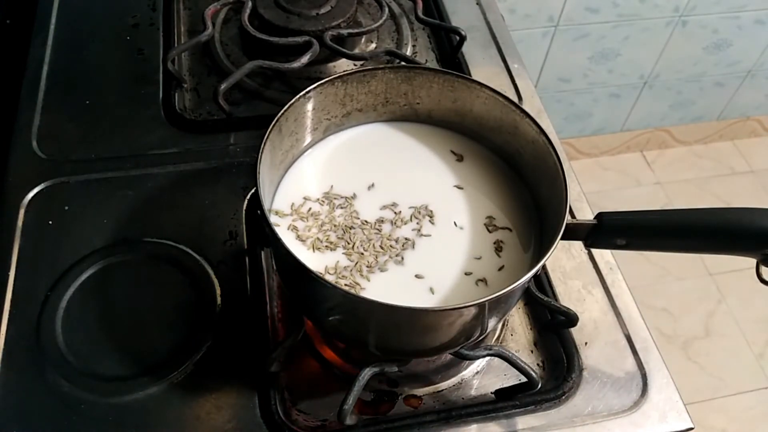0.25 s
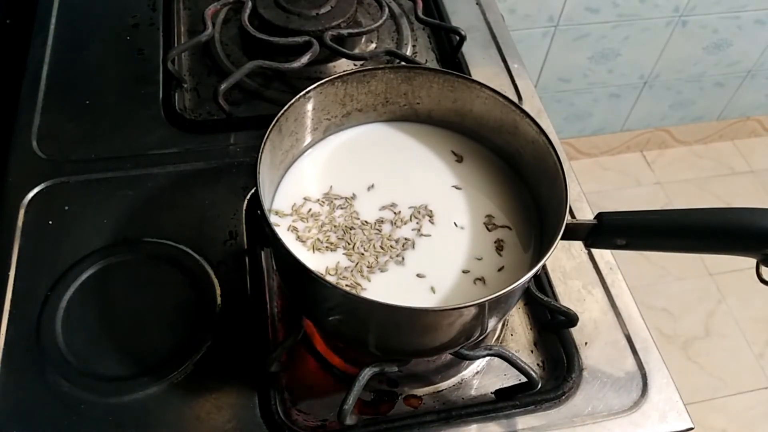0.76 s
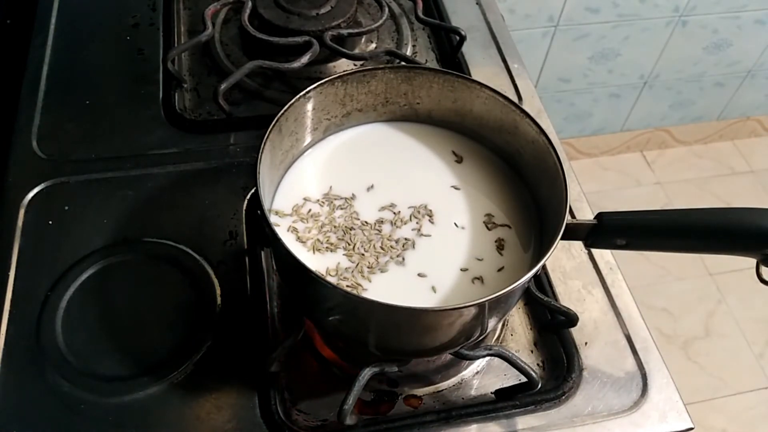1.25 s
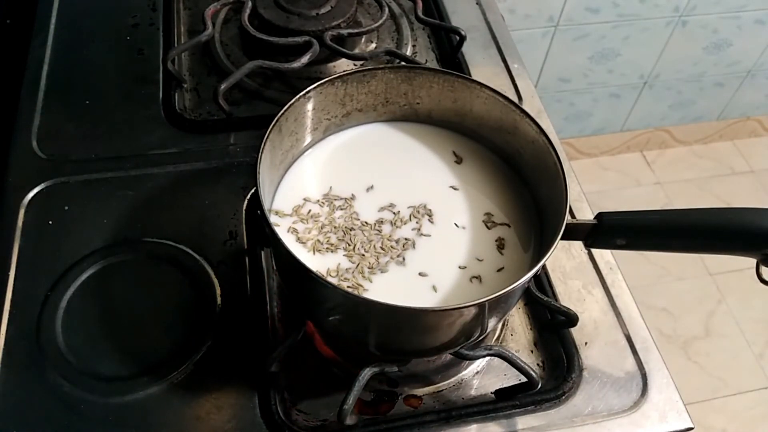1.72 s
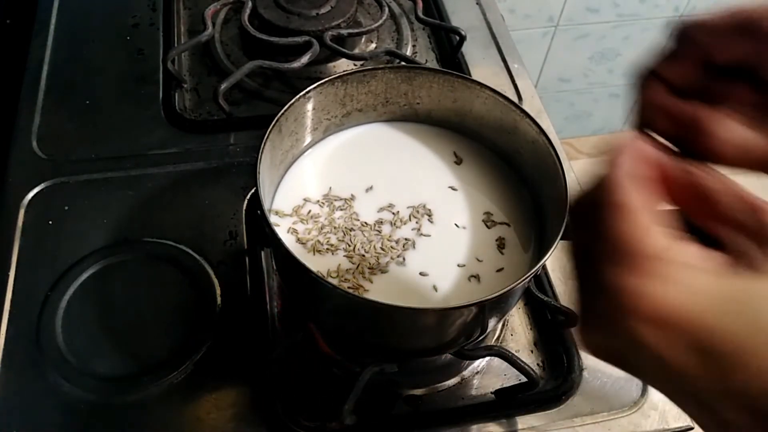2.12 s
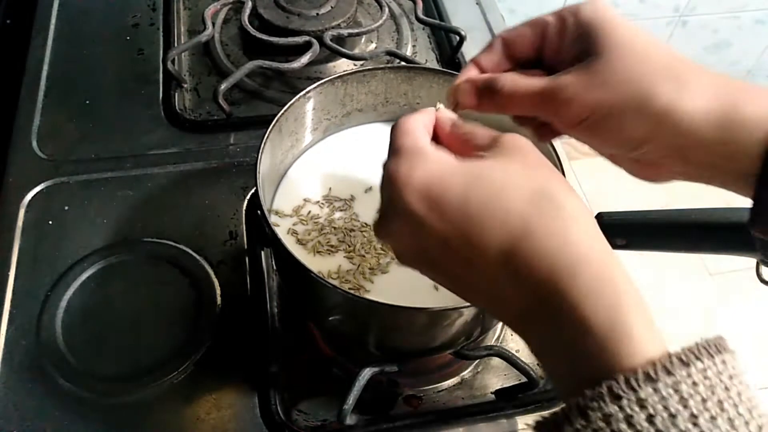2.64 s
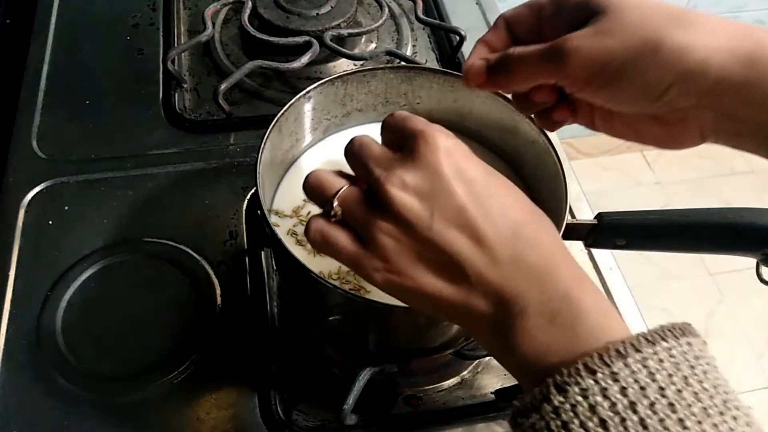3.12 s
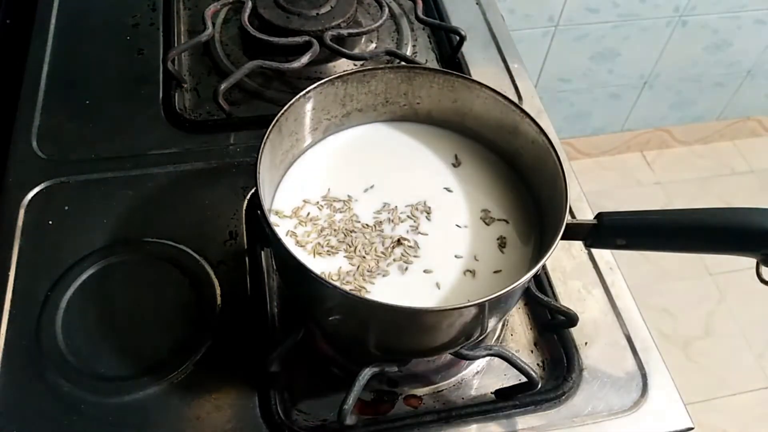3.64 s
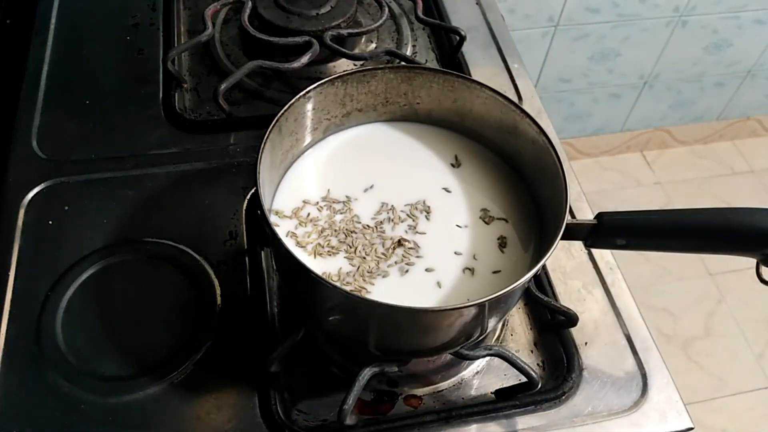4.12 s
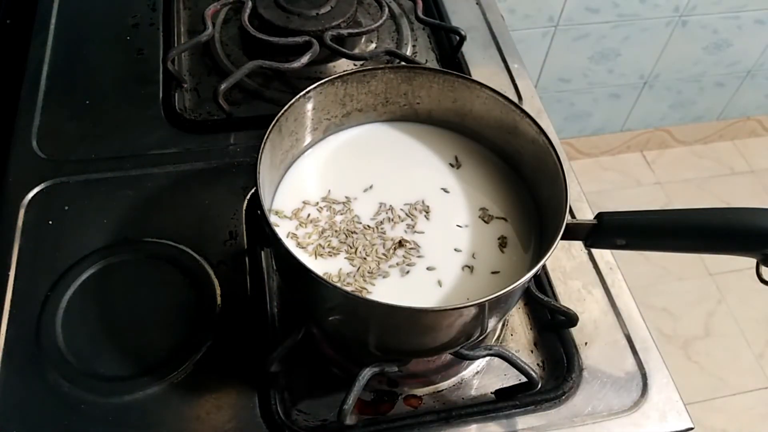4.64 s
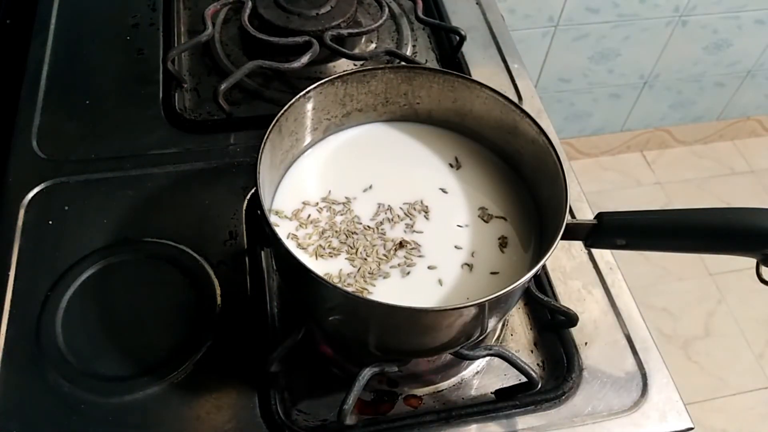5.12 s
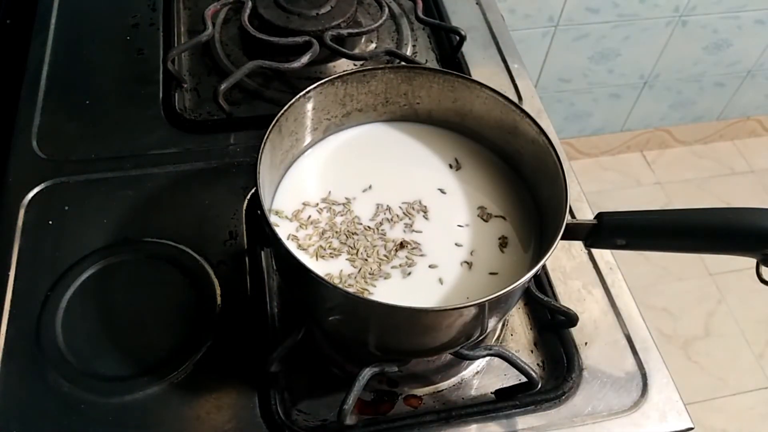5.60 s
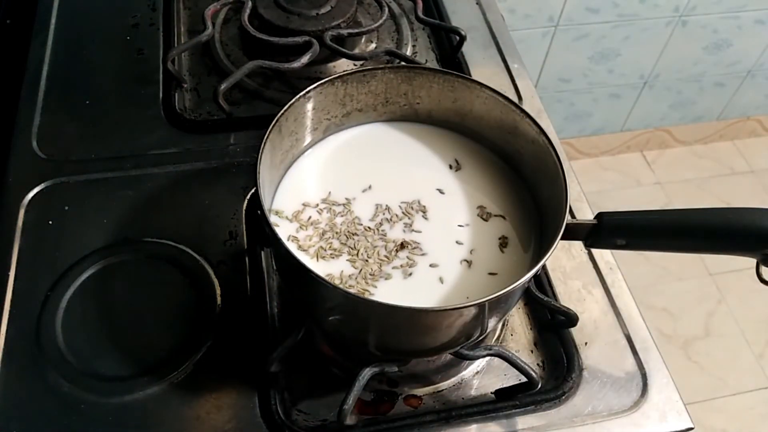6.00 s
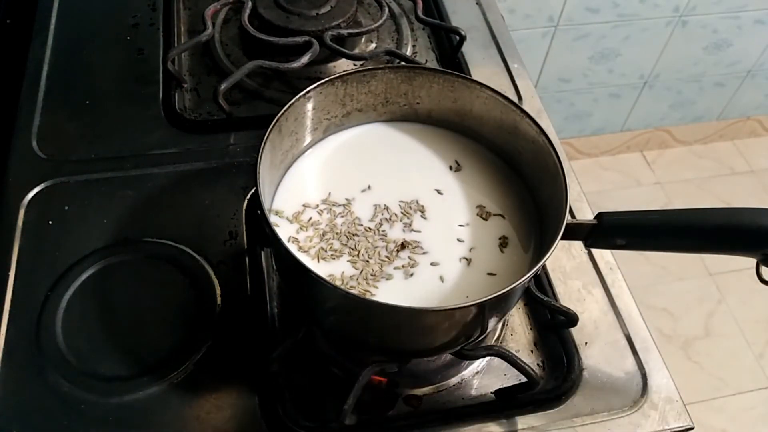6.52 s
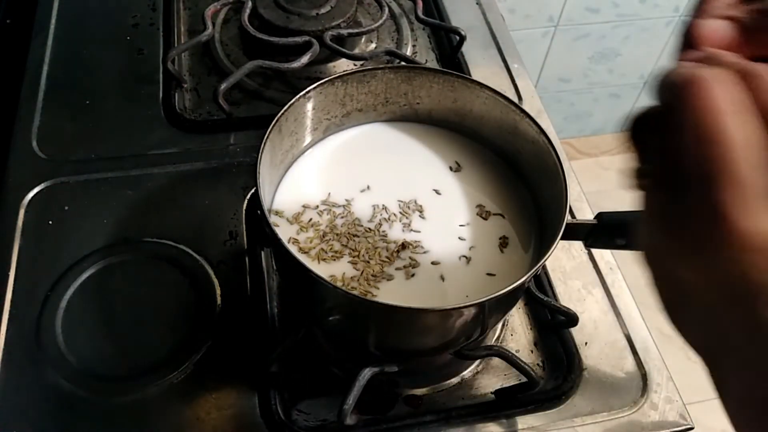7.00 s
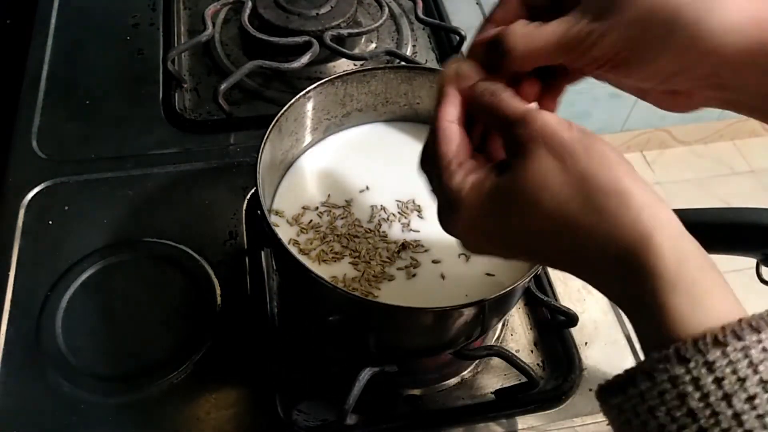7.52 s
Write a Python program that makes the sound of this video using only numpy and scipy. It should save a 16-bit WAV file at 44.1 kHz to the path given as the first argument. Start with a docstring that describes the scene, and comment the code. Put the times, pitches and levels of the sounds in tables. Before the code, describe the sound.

Close, bright gas-flame hiss wavering under a pan of milk, punctuated by a few metal clicks, soft knocks and a final dry pod crack.

```python
"""Milk on the gas hob

A gas burner hisses in small surges under a saucepan of milk in a tiled kitchen, heard from just above the hob.
Filtered noise makes its jet, the rush of its flames and a hollow note under the pan. The heating pan ticks
with short resonant clicks, once with a sizzle of grainy noise; a few soft knocks ring on decaying sines.
At the end fingers crack a spice pod over the pan, in short noise bursts. Behind it all, noise in the low
resonances of the room makes a faint rumble from outside, over a faint kitchen hum."""
import sys
import numpy as np
from scipy import signal
from scipy.fft import rfft, irfft
from scipy.io import wavfile
from scipy.ndimage import uniform_filter1d

SR = 44100
rng = np.random.default_rng(int(sys.argv[2]) if len(sys.argv) > 2 else 0)


def digitize_waveform(pressure):
    """Quantize a signal to 16-bit integers and store it at the path in sys.argv[1].

    Rows of a 2-D input are taken as channels; values are limited to [-1, 1].
    """
    field = np.atleast_2d(pressure).T
    bounded = np.clip(field, -1, 1)
    quanta = np.round(bounded * 32767).astype(np.int16)
    wavfile.write(sys.argv[1], SR, quanta)


N = 342216
TIME = np.arange(N) / SR  # s
FREQS = np.arange(N // 2 + 1) * SR / N  # Hz


def undb(db):
    """Decibels to gain."""
    return 10 ** (np.asarray(db) / 20)


def unit(x):
    """Scale to rms 1."""
    return x / np.sqrt(np.mean(x ** 2))


def colour(points):
    """Frequency response through (Hz, dB) points, falling away below the first."""
    hz, db = np.transpose(points)
    response = undb(np.interp(np.log(FREQS + 1), np.log(hz), db))
    return response * np.minimum(FREQS / hz[0], 1) ** 2


def resonance(hz, width):
    """Response of one resonator, gain 1 at its centre."""
    return 1j * FREQS * width / (hz ** 2 - FREQS ** 2 + 1j * FREQS * width)


def shape(x, response):
    """Filter by a frequency response."""
    return irfft(rfft(x) * response, N)


def above(x, hz):
    """The part of a sound that lies above a pitch."""
    return shape(x, 1 - 1 / (1 + (FREQS / hz) ** 10))


def noise(likeness=0., pan_db=0.):
    """Stereo white noise with a given left-right correlation and balance (positive is louder on the left)."""
    mid, side = rng.standard_normal((2, N))
    c = np.clip(likeness, -1, 1)
    mid = mid * np.sqrt((1 + c) / 2)
    side = side * np.sqrt((1 - c) / 2)
    return np.array([mid + side, mid - side]) * undb([[pan_db / 2], [-pan_db / 2]])


def flicker(rate, depth_db):
    """A gain that wanders at random, up to about rate times a second, by depth_db rms."""
    wander = unit(shape(rng.standard_normal(N), np.exp(-(FREQS / rate) ** 2)))
    return undb(depth_db * wander)


def steady(x, seconds):
    """Take the slow chance swells out of a narrow noise."""
    power = uniform_filter1d(np.mean(x ** 2, axis=0), int(seconds * SR), mode="wrap")
    return x / np.sqrt(power)


def fade(start, t60):
    """An envelope that jumps to 1 and dies away by 60 dB in t60 seconds."""
    age = TIME - start
    return (age >= 0) * np.exp(-np.log(1000) * np.clip(age / t60, 0, 10))


def bell(centre, half):
    """An envelope that swells to 1 and falls again."""
    return np.exp(-((TIME - centre) / half) ** 2 / 2)


def curve(points):
    """A (time, dB) curve as a gain per sample."""
    return undb(np.interp(TIME, *np.transpose(points)))


def echo_response(envelope, pan_db=0.):
    """Response of countless reflections that die along an envelope; it keeps the power of the sound."""
    return rfft(unit(noise(pan_db=pan_db) * envelope)) / np.sqrt(N)


def standing(depth, t60):
    """Reflections between hard surfaces leave fine peaks and dips, different on each side."""
    return 1 + depth * echo_response(fade(0, t60))


def burner():
    """One gas flow drives jet and flames; both sag slowly, and hands over the pan shade the jet."""
    flow = surges()
    shade_db, treble_shade_db = hands()
    jet_db, jet_share = -38.5, 0.3  # level between surges, and the part of a surge that the jet follows
    jet_sag, treble_sag, flame_sag = 0.44, 0.21, 0.78  # dB per s; the jet's top end sags more slowly
    gas = jet()
    treble = above(gas, 8000)
    hiss = (gas - treble) * undb(-jet_sag * TIME - shade_db)
    hiss = hiss + treble * undb(-treble_sag * TIME - treble_shade_db)

    # the low part of the rush follows the flow more strongly than the high part: dB per dB of flow
    low_share, high_share = 1.135, 0.9
    flame_db = -55.5
    flame_flow = flow - lulls()
    fire = flame()
    bright = above(fire, 2070)
    rush = (fire - bright) * undb(low_share * flame_flow) + bright * undb(high_share * flame_flow)
    return undb(jet_db + jet_share * flow) * hiss + undb(flame_db - flame_sag * TIME) * rush + hollow()


def surges():
    """Rise of the gas flow in dB: each surge comes quickly, holds and ebbs away."""
    # surges of the gas flow: (start [s], rise [dB], hold [s])
    gas_surges = [(-0.1, 4, 0.093), (0.154, 3.5, 0.059), (0.623, 6.5, 0.26), (1.277, 4.5, 0.083),
                  (1.87, 6.5, 0.43), (2.587, 4, 0.34), (3.408, 8.5, 0.22), (3.905, 3.5, 0.36),
                  (4.35, 4.5, 0.14), (4.814, 7, 0.33), (5.453, 8, 0.19), (6.318, 10.5, 0.077),
                  (7.144, 4, 0.29)]
    attack, release = 0.085, 0.35  # s
    rise = 0
    for start, db, hold in gas_surges:
        age = TIME - start
        onset = np.clip(age / attack, 0, 1)
        ebb = np.exp(-np.maximum(age - attack - hold, 0) / release)
        rise = rise + db * onset * ebb
    return rise


def hands():
    """Loss in dB that hands over the pan bring to the hiss, below and in its treble."""
    # hands in the way of the microphone: (from [s], to [s], loss [dB], loss in the treble [dB])
    hand_passes = [(2.152, 3.418, 1.5, 1.5), (7.435, 7.9, 2.5, 0.2)]
    move = 0.033  # s to come or go
    loss = 0
    for start, end, db, treble_db in hand_passes:
        cover = np.clip(np.minimum(TIME - start, end - TIME) / move + .5, 0, 1)
        loss = loss + np.outer([db, treble_db], cover)
    return loss


def lulls():
    """Dips of the flame rush in dB of flow: it sinks, stays low and comes back at once."""
    # lulls of the flames: (time of return [s], time from first sinking to return [s], depth [dB of flow])
    flame_lulls = [(4.81, 0.093, 3), (6.36, 0.61, 1), (7.195, 0.23, 8), (7.67, 0.14, 3.5)]
    back = 0.014  # s
    dip = 0
    for s, sink, db in flame_lulls:
        dip = dip + np.interp(TIME, [s - sink, s - sink / 2, s, s + back], [0, db, db, 0])
    return dip


def rings():
    """Lift that the narrow rings of burner and pan give to any sound under the pan."""
    # rings of burner and pan: (pitch [Hz], width [Hz], lift [dB])
    metal_rings = [(2770, 90, 3), (3526, 70, 4), (4344, 80, 4), (5471, 60, 4.5), (6000, 30, 4),
                   (6400, 50, 3), (7325, 70, 3), (7477, 45, 3), (9016, 70, 4)]
    return 1 + sum((undb(db) - 1) * abs(resonance(hz, width)) ** 2 for hz, width, db in metal_rings)


def jet():
    """Gas hisses evenly from the nozzle, coloured by the burner's rings."""
    # jet as heard towards the left and the right: (pitch [Hz], level per Hz [dB])
    left = [(2500, -40), (3600, -17.5), (4400, -7), (5600, -5), (6500, -3.5), (7400, 0.5), (8500, -3),
            (10500, -11), (12500, -15.5), (14300, -14.5)]
    right = [(2500, -25), (3600, -16.5), (4400, -7), (5600, -5), (6500, 2), (7300, -1), (8300, -8),
             (10500, -12), (12500, -17.5)]
    ripple = standing(depth=.2, t60=.12)
    response = np.array([colour(left), colour(right)]) * rings() * ripple
    return unit(shape(noise(likeness=-0.087), response)) * flicker(rate=15, depth_db=.35)


def flame():
    """The ring of small flames gives a soft rush; two parts of the ring flutter each on its own."""
    # flame under the pan: (pitch [Hz], level per Hz [dB])
    flame_colour = [(780, -17), (930, -8), (1100, 2.5), (1450, 1.5), (2300, 0.5), (2800, 3), (3600, 0.5),
                    (6000, -18.5)]
    response = colour(flame_colour) * rings()
    rush = 0
    for _ in range(2):
        part = shape(noise(likeness=0.69, pan_db=2.5), response * standing(depth=1.0, t60=0.069))
        rush = rush + part * flicker(rate=5.7, depth_db=5)
    return steady(rush, seconds=0.069) * flicker(rate=27, depth_db=1.1)


def hollow():
    """The gap under the pan gives the flames a hollow note that flutters, comes and goes."""
    # hollow note: (pitch [Hz], level per Hz [dB])
    note_colour = [(480, -28), (570, -14), (625, 1), (685, 1.5), (722, 4), (770, -5.5), (860, -16),
                   (1100, -21)]
    # its loudness over time: (time [s], level [dB])
    note_level = [(0, -57), (.3, -62.5), (.64, -69), (.75, -57.5), (1.0, -55.5), (1.25, -70.5), (1.42, -57),
                  (1.87, -69.5), (1.95, -59), (2.55, -61), (3.0, -63.5), (3.14, -67), (3.65, -58.5),
                  (3.87, -64), (4.0, -56), (4.7, -62.5), (5.7, -58), (6.02, -69), (6.2, -63), (6.5, -60.5),
                  (6.75, -75), (7.03, -57.5), (7.22, -76), (7.45, -64.5), (7.76, -67)]
    response = colour(note_colour) * standing(depth=0.32, t60=0.18)
    note = shape(noise(likeness=0.53, pan_db=0.5), response)
    return curve(note_level) * steady(note, seconds=0.18) * flicker(rate=7.7, depth_db=1.5)


def ticks():
    """Hot metal slips in an instant: a ping of a millisecond, a bright crack, a duller body and a ring of steel."""
    # pan ticks, some slipping again within milliseconds: (time [s], level [dB], pitch [Hz],
    # crack re ping [dB], body re ping [dB], body pitch [Hz], ring re ping [dB])
    pan_ticks = [(0.1916, -16, 7300, -1, -6.5, 1800, -4), (0.1936, -18, 7950, -8, -19, 4200, -7),
                 (1.1166, -29.5, 7200, -9, -6, 3000, -5), (2.1247, -23.5, 7660, 1.5, -22, 4500, -12),
                 (3.6527, -20, 6850, -20, -6.5, 3060, -16), (3.9956, -32, 7400, -16, -10, 2980, -12),
                 (5.5531, -3.5, 6740, -15, -8, 4230, -22), (5.5586, -14, 6560, -2, -18, 3820, -19),
                 (5.672, -14.5, 7040, -27, -30, 4000, -26), (5.8476, -31, 7500, -16, -20, 4000, -12),
                 (7.0111, -30, 7400, 2, -20, 4000, -15)]
    # what the steel pan rings with: (pitch [Hz], level [dB], t60 [s])
    pan_modes = [(6918, 0, 0.075), (8134, -9, 0.04), (9442, -16, 0.047), (11430, -12, 0.08),
                 (13510, -17, 0.025)]
    crack = snap(resonance(9200, width=6000) ** 2)
    # a mode's width follows from its decay time
    ring = snap(sum(undb(db) * resonance(hz, np.log(1000) / np.pi / t60) for hz, db, t60 in pan_modes))
    spectrum = 0
    for s, db, hz, crack_db, body_db, body_hz, ring_db in pan_ticks:
        ping = snap(resonance(hz, width=3050) ** 2 * resonance(hz, width=6600))
        body = snap(resonance(body_hz, width=3000))
        tick = ping + undb(crack_db) * crack + undb(body_db) * body + undb(ring_db) * ring
        spectrum = spectrum + undb(db) * tick * np.exp(-2j * np.pi * FREQS * s)  # delayed to its time
    return kitchen(irfft(spectrum, N))


def snap(response):
    """Scale a click's response to the energy of one millisecond at rms 1."""
    return response * np.sqrt(SR / 1000 / np.mean(abs(response) ** 2))


def kitchen(x):
    """A small sound at the pan arrives from the left, then comes back scattered from hob, tiles and room."""
    # direct sound, then early reflections off hob and tiles: (delay [s], left [dB], right [dB]),
    # before the gains of the mix below
    arrivals = [(0, 0, -12), (.0006, -12, -15), (.0019, -12, -16), (.0031, -19, -13), (.0063, -13, -12),
                (.0086, -14, -14)]
    direct, *bounces = (undb([[left], [right]]) * np.exp(-2j * np.pi * FREQS * delay)
                        for delay, left, right in arrivals)
    scatter = echo_response(fade(0, t60=0.007))
    tail_envelope = fade(0.0018, t60=0.1) + undb(-2) * fade(0.00081, t60=0.45)
    tail = echo_response(tail_envelope, pan_db=10)
    return shape(x, undb(-1.5) * direct + undb(1.5) * scatter * sum(bounces) + undb(-6.5) * tail)


def sizzle():
    """A droplet on the hot pan boils away in a short, grainy spit."""
    # the droplet: (centre [s], half length [s], level [dB])
    centre, half, db = (5.598, 0.033, -30)
    low_ring = abs(resonance(hz=6450, width=1100) * resonance(hz=6800, width=4500))
    high_ring = .14 * abs(resonance(hz=9100, width=1200)) ** 2
    spit = unit(shape(noise(pan_db=-1.0), low_ring + high_ring))
    return undb(db) * spit * bell(centre, half) * flicker(rate=450, depth_db=2.0)


def pod():
    """A dry husk splits between the fingertips: sharp cracks, then a short rustle."""
    # noise bursts of the husk: (time [s], level [dB], pitch [Hz], resonator width [Hz], t60 [s])
    husk_cracks = [(7.6042, -23, 12300, 3500, 0.003), (7.671, -28, 10500, 10000, 0.018),
                   (7.6828, -21, 8800, 7000, 0.006), (7.6866, -25, 2100, 1800, 0.008),
                   (7.68, -44, 2250, 1800, 0.4)]
    cracks = 0
    for s, db, hz, width, t60 in husk_cracks:
        grain = unit(shape(rng.standard_normal(N), resonance(hz, width) ** 2))
        cracks = cracks + undb(db) * fade(s, t60) * grain
    room = shape(cracks, echo_response(fade(0.0027, t60=0.075)))
    room = room * (TIME > husk_cracks[0][0])  # no reflection before the first crack
    return cracks * undb([[0], [-8]]) + undb(-7) * room


def knocks():
    """Soft, dull bumps near the stove, lingering briefly in the room."""
    # soft knocks: (time [s], level before the filter [dB])
    bumps = [(0.191, -44), (0.902, -38), (1.503, -48), (3.652, -43), (6.12, -37)]
    # what they ring with: (pitch [Hz], level [dB], t60 [s])
    bump_modes = [(340, -2.5, 0.042), (404, 0, 0.048), (470, 2, 0.013), (640, -5, 0.04)]
    blows = np.zeros(N)
    for s, db in bumps:
        for hz, mode_db, t60 in bump_modes:
            tone = np.sin(2 * np.pi * hz * (TIME - s) + rng.uniform(0, 2 * np.pi))
            blows += undb(db + mode_db) * fade(s, t60) * tone
    soft = signal.butter(2, [280, 800], "band", fs=SR, output="sos")  # a soft contact has no sharp edge
    room = undb(-7.5) * echo_response(fade(0.0084, t60=0.42))
    return shape(signal.sosfilt(soft, blows), undb([[-1.0], [-4.0]]) + room)


def rumble():
    """Noise from outside booms in the room's standing waves, its lower ranges nearly alike left and right."""
    # room resonances: (pitch [Hz], width [Hz], level [dB])
    deep_modes = [(76.5, 29, -19), (94.3, 16, -2), (103.6, 14, 1)]
    middle_modes = [(134, 13, 0), (162, 16, 0), (176, 14, -7), (222, 14, -7)]
    # upper rumble: (pitch [Hz], level per Hz [dB])
    upper_colour = [(220, 2.5), (290, 9.5), (340, 6.5), (385, 2), (455, 2.5), (560, -8), (800, -17)]
    # loudness of each range: (time [s], level [dB])
    deep_level = [(0, -61), (.7, -57.5), (1.5, -60), (1.75, -54), (2.25, -50.5), (2.85, -57.5), (3.06, -47),
                  (3.3, -59.5), (3.65, -50.5), (4.4, -59), (5.75, -55.5), (5.98, -45.5), (6.58, -51.5),
                  (6.85, -44.5), (7.4, -51.5), (7.76, -49.5)]
    middle_level = [(0, -56), (.15, -52.5), (.35, -59.5), (1.6, -62), (2.3, -51.5), (3.0, -56.5),
                    (4.5, -52.5), (5.4, -55.5), (6.0, -56.5), (6.5, -64.5), (7.2, -58.5), (7.75, -56)]
    upper_level = [(0, -52.5), (.5, -72), (.95, -57), (1.4, -72), (1.72, -84), (1.93, -62.5), (2.4, -60),
                   (2.8, -58.5), (3.1, -64.5), (3.5, -61.5), (4.25, -56.5), (4.95, -72.5), (5.3, -58.5),
                   (5.6, -55.5), (6.0, -70), (6.6, -78.5), (7.25, -68.5), (7.6, -59.5)]
    out = 0
    for modes, level in ((deep_modes, deep_level), (middle_modes, middle_level)):
        power = sum(undb(db) ** 2 * abs(resonance(hz, width)) ** 4 for hz, width, db in modes)
        boom = shape(noise(likeness=0.99, pan_db=0.8), np.sqrt(power))
        out = out + curve(level) * steady(boom, seconds=0.2)
    upper = unit(shape(noise(likeness=0.53, pan_db=3.3), colour(upper_colour)))
    return out + curve(upper_level) * upper * flicker(rate=25, depth_db=3.0)


def puffs():
    """The upper rumble gathers now and then into a soft, hollow puff in one resonance."""
    # puffs: (centre [s], half length [s], pitch [Hz], level [dB])
    soft_puffs = [(2.39, 0.036, 460, -56.5), (2.64, 0.14, 457, -61.5), (3.45, 0.11, 335, -66),
                  (4.24, 0.047, 448, -57.5)]
    out = 0
    for centre, half, hz, db in soft_puffs:
        breath = unit(shape(noise(likeness=0.56), resonance(hz, width=49) ** 2))
        out = out + undb(db) * bell(centre, half) * breath
    return out


def room_tone():
    """The kitchen hums faintly; now and then one of its resonances booms on an unsteady pitch."""
    # steady hum of the kitchen: (pitch [Hz], level per Hz [dB])
    hum_colour = [(45, -10), (120, -2.5), (185, -3.5), (222, 2.5), (275, -4), (320, -15.5), (400, -55)]
    # brief booms of single room resonances: (centre [s], half length [s], pitch [Hz], rms level [dB])
    room_booms = [(4.145, 0.058, 158, -46.5), (4.276, 0.088, 136.6, -50), (4.515, 0.066, 164.4, -48),
                  (5.5, 0.3, 174.8, -56.5)]
    hum = undb(-59.5) * unit(shape(noise(likeness=0.78, pan_db=-1.0), colour(hum_colour)))
    for centre, half, hz, db in room_booms:
        phase = 2 * np.pi * np.cumsum(hz * flicker(rate=12.6, depth_db=0.14)) / SR
        hum = hum + undb(db) * np.sqrt(2) * np.sin(phase) * bell(centre, half)
    return hum


def scene():
    """The burner over the room's rumble, with the small sounds on top."""
    return burner() + ticks() + sizzle() + pod() + knocks() + rumble() + puffs() + room_tone()


def record(dry):
    """The phone rounds the loudest peaks and cuts the top."""
    ceiling, top_hz = 0.66, 14250
    rounded = dry / (1 + (dry / ceiling) ** 4) ** (1 / 4)
    return signal.sosfilt(signal.ellip(10, .2, 70, top_hz, fs=SR, output="sos"), rounded)


dry = scene()
out = record(dry)
digitize_waveform(out)
```